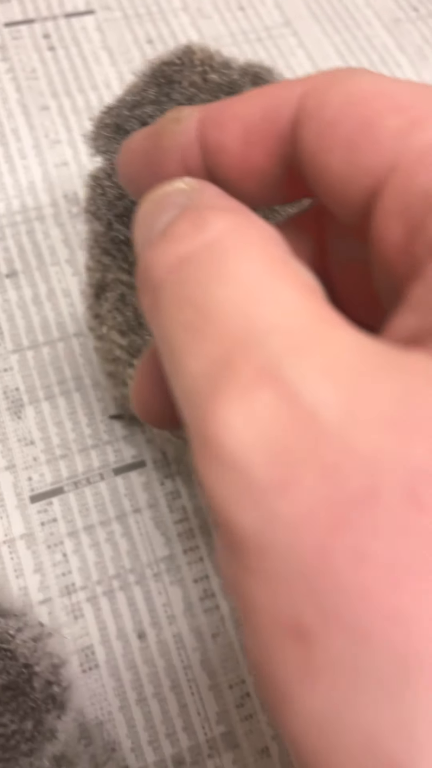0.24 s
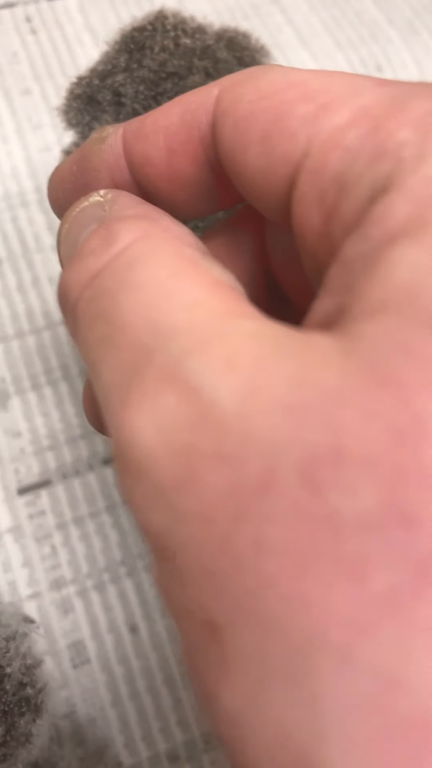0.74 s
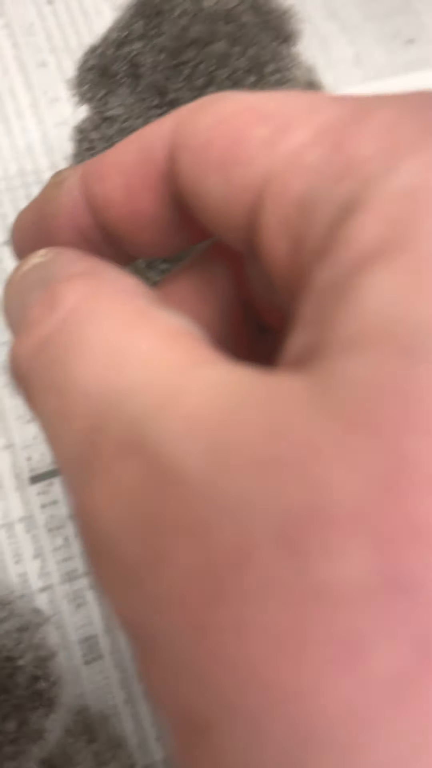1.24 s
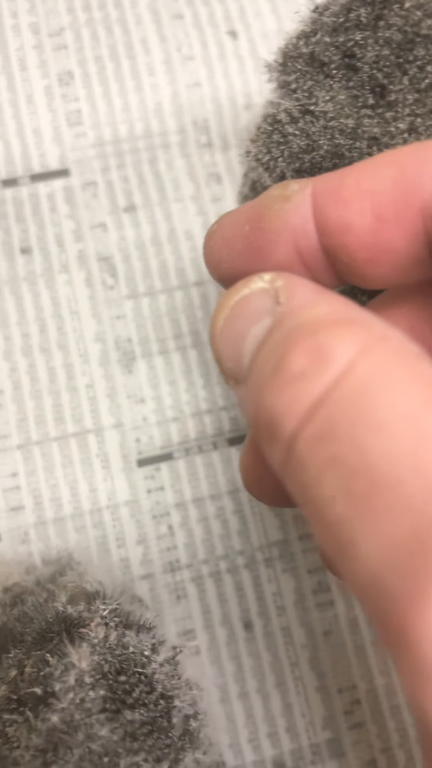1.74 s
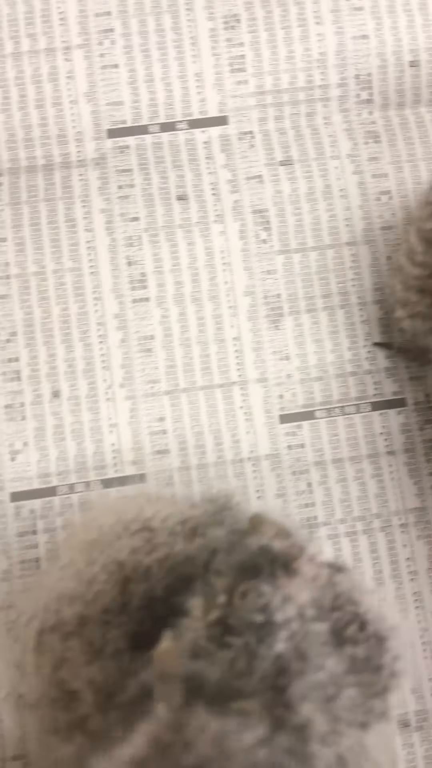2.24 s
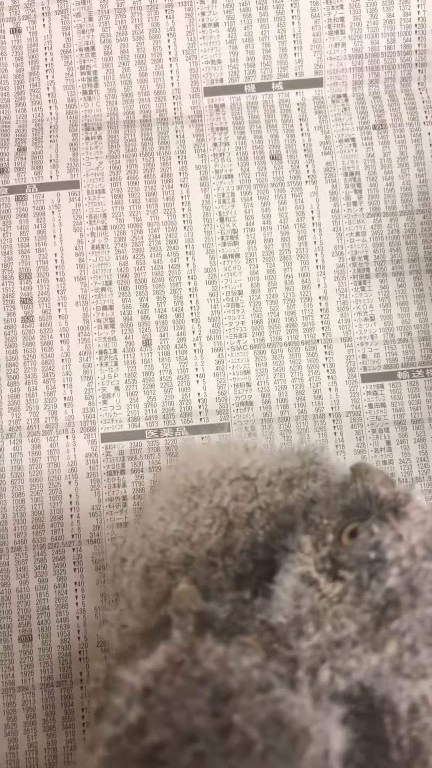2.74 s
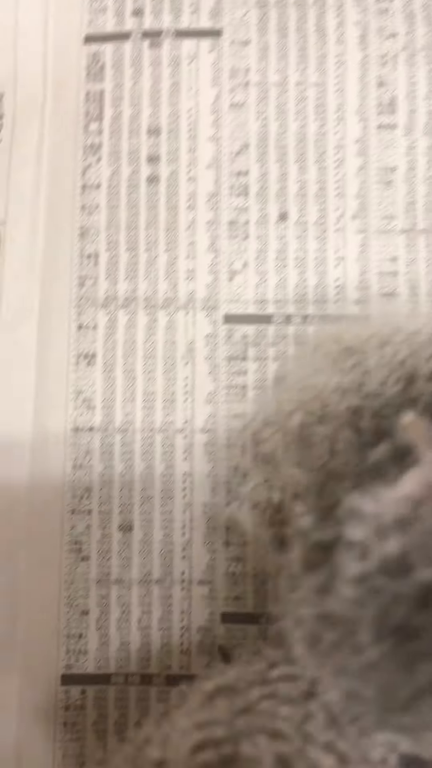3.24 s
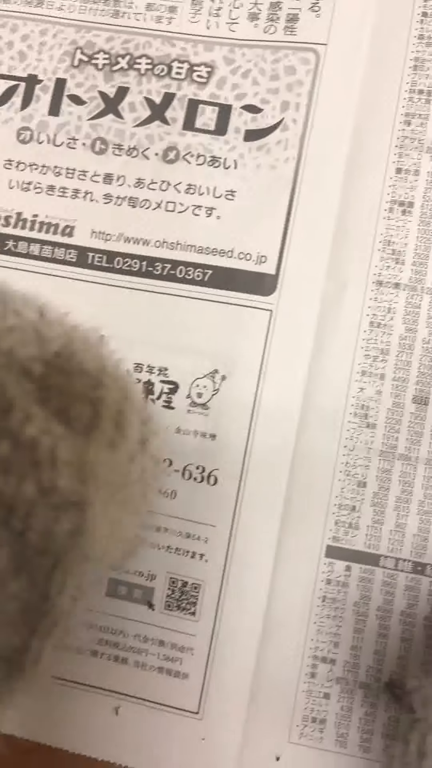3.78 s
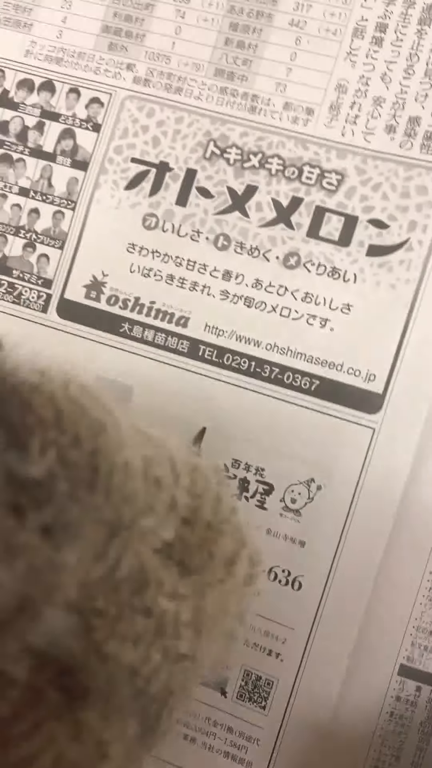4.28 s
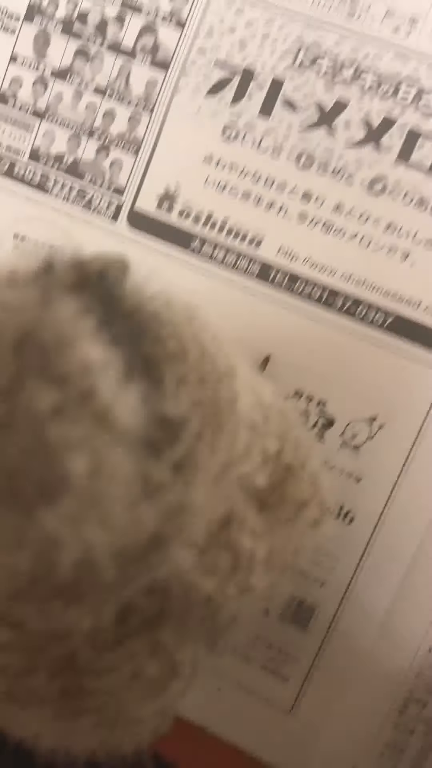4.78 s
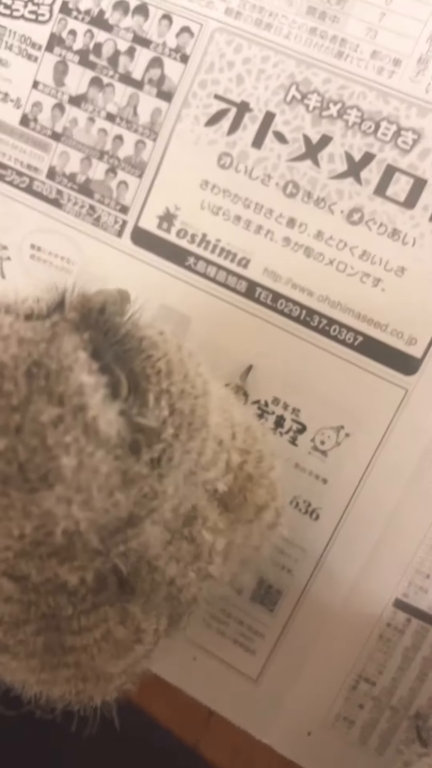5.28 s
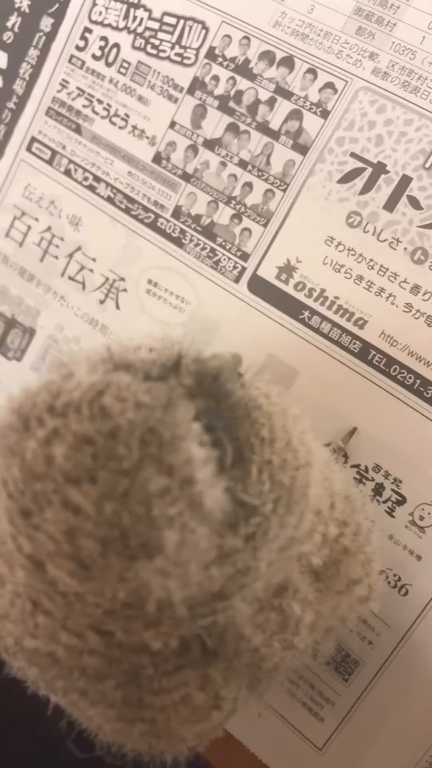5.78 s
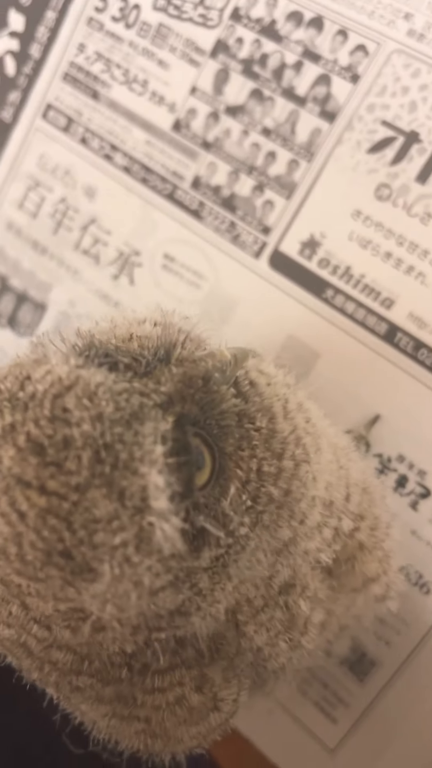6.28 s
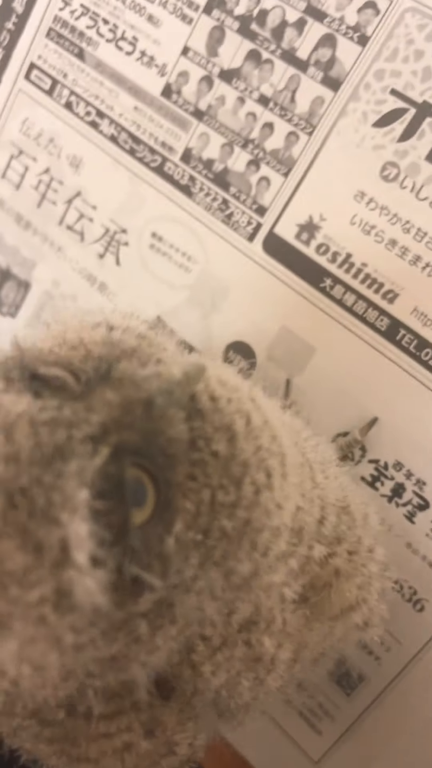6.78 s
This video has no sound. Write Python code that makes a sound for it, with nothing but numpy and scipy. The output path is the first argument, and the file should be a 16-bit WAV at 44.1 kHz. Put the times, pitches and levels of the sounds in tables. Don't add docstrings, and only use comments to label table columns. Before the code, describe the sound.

Owl chicks beg with harsh, rasping hisses in a small humming room, one faint call then three loud ones, with feather rustles and foot taps.

```python
import sys
import numpy as np
from scipy import signal
from scipy.fft import rfft, irfft, next_fast_len
from scipy.io import wavfile

SR = 44100
rng = np.random.default_rng(int(sys.argv[2]) if len(sys.argv) > 2 else 0)


def master_out(mix):
    frames = np.transpose(np.atleast_2d(mix))
    ceiling = np.clip(frames, -1, 1)
    pcm = np.round(ceiling * 32767).astype(np.int16)
    wavfile.write(sys.argv[1], SR, pcm)


def gain_from_db(level_db):
    decades = np.asarray(level_db, float) / 20
    return 10 ** decades


N = 309670

# [f/Hz, level/dB]
THROAT = [(980, -14), (1130, -2.5), (1600, 8.5), (2400, -0.5), (3500, -0.5), (4600, 0), (5300, 1),
          (5900, 6.5), (6800, -0.5), (7600, -0.5), (8800, 7), (10200, -0.5), (11500, -11), (12500, -4.5)]
# [f/Hz, level/dB per Hz]
FEATHERS = [(2000, -10), (4000, -6), (7000, -13), (9000, -3), (11000, -1.5), (12500, -4.5)]


def chicks():
    # [t/s, chaos 0-1]
    disturbance = [
        [(1.0, .5), (1.2, .4), (1.86, .42)],
        [(2.5, .35), (2.6, 0), (2.745, .06), (2.75, .38), (2.97, .4), (3.1, .8), (3.37, 1.0)],
        [(4.24, .8), (4.31, .3), (4.55, .42), (4.72, .72), (4.88, .45), (5.12, .9), (5.215, .8), (5.225, .45),
         (5.39, .55)],
        [(6.34, .3), (6.44, .5), (6.46, 0), (6.6, .08), (6.61, .2), (6.85, .5), (7.02, .4)],
    ]
    unrest = in_time(disturbance)[0]
    high_rows, low_rows = valves(lambda s: unrest[min(int(s * SR), N - 1)])
    high_hz, first_db, second_db, high_on = in_time(high_rows)
    low_hz, tone_db, mixed_db, breath_db, low_on = in_time(low_rows, fade_s=0.0013)
    chaos = unrest * (0.12 + 0.88 * low_on)
    grip = np.clip(3.7 * chaos, 0, 1)

    high = phase(high_hz + 12 * wander(60) + 460 * chaos ** 0.8 * wander(700))
    low = phase(low_hz + 240 * chaos ** 2 * wander(500))
    flutter = gain_from_db(1.0 * wander(100) + 3.6 * np.sqrt(chaos) * np.minimum(wander(300), 1.6))
    loose, rattling = rattle()

    mixed = combination_tones(high, low, grip, tone_db, mixed_db, second_db)
    air_jet = breath(low, chaos, grip, breath_db, mixed_db, second_db, rattling)
    engaged = low_on * (low_valve(low, low_hz, tone_db, chaos) + mixed + air_jet)
    engaged = filtered(engaged, lambda hz: gain_from_db(at_hz(THROAT, hz)))
    return high_on * flutter * gain_from_db(6) * whistle(high, first_db, second_db, unrest) + engaged + loose


def valves(unrest_at):
    # [t/s, f/Hz, level/dB]
    leads = [
        [(1.066, 2580, -75), (1.078, 2721, -63), (1.085, 2800, -80), (1.118, 2755, -65), (1.124, 2774, -63),
         (1.148, 2680, -63.5), (1.18, 2760, -60.5)],
        [(2.462, 3017, -82), (2.482, 3127, -49), (2.5, 3315, -58), (2.51, 3241, -44.5), (2.535, 3102, -89)],
        [(2.635, 3243, -56), (2.657, 3368, -36), (2.687, 3537, -37), (2.711, 3674, -31.5), (2.748, 3868, -41)],
        [(4.215, 2938, -76), (4.225, 3083, -51.5), (4.255, 3330, -53), (4.272, 2968, -54.5),
         (4.285, 2930, -60.5), (4.307, 3131, -41)],
        [(6.318, 3063, -88), (6.324, 3158, -45.5), (6.35, 3376, -47.5), (6.37, 3343, -50), (6.43, 3260, -46),
         (6.474, 3564, -43.5), (6.494, 3457, -42.5), (6.558, 3798, -39), (6.608, 4061, -27)],
    ]
    pinch_db = [-2.5, -4, -18, -2, -8.5]
    # [t/s, length/s, f/Hz, tone level/dB, mixed level/dB]
    brushes = [
        (1.075, .05, 1157, -54, -56),
        (2.48, .025, 1350, -52.5, -56),
        (2.722, 0.02394, 1445, -58, -47),
        (4.228, .022, 1185, -47, -53),
        (6.332, .035, 1236, -41, -60.5),
        (6.533, .057, 1442, -52.5, -35),
    ]
    # [t/s, high f/Hz, low f/Hz, effort level/dB, low valve level/dB]
    far = [(1.182, 2822, 1202, -67, -62), (1.316, 3063, 1240, -62, -59.5), (1.41, 3118, 1385, -53, -62.5),
           (1.584, 3218, 1410, -49.5, -62), (1.66, 3165, 1356, -51.5, -58.5),
           (1.75, 3020, 1255, -54.5, -60.5), (1.834, 2837, 1170, -60, -56), (1.859, 2751, 1216, -77, -77)]
    short_hiss = [(2.75, 3999, 1421, -38, -44.5), (2.8, 4090, 1439, -37.5, -37.5),
                  (2.968, 4333, 1548, -31.5, -42), (3.03, 4373, 1511, -31, -39),
                  (3.118, 4130, 1416, -30.5, -43), (3.15, 3980, 1300, -31, -47),
                  (3.21, 3739, 1272, -30.5, -46.5), (3.296, 3381, 1105, -31, -47.5),
                  (3.37, 3305, 1190, -39.5, -55)]
    long_hiss = [(4.309, 3302, 1195, -37, -43.5), (4.4, 3630, 1285, -36.5, -51.5),
                 (4.55, 3990, 1450, -34, -49), (4.68, 4240, 1607, -30.5, -49.5),
                 (4.781, 4393, 1640, -30.5, -43), (4.83, 4380, 1537, -29.5, -43),
                 (4.975, 4160, 1489, -32.5, -41.5), (5.088, 4050, 1232, -33, -43.5)]
    again = [(5.092, 3983, 1481, -37.5, -44.5), (5.2, 3831, 1509, -36, -46),
             (5.235, 3700, 1440, -34.5, -50.5), (5.3, 3487, 1328, -37.5, -52),
             (5.39, 3262, 1540, -45, -68.5)]
    last = [(6.61, 3999, 1450, -28.5, -44), (6.66, 4190, 1490, -33.5, -44), (6.7, 4230, 1560, -34, -48),
            (6.778, 4286, 1566, -31, -45.5), (6.836, 4380, 1594, -32.5, -44),
            (7.02, 4450, 1522, -30.5, -41.5)]
    carry_db = [-3, 0.5, -2, -1.5, 3.5]
    mixing_db = [-1, -2, -3, 1, -2.5]
    breath_db = -11
    swell = [(0, -1, 8.5), (0.4595, 0, 0), (1, 0.5, 19)]

    high = [[(s, hz, db, db + pinch) for s, hz, db in rows] for rows, pinch in zip(leads, pinch_db)]
    low = [[(s + part * length, hz * (1 + 0.04 * bend), tone - loss,
             mix - loss / 2, tone - loss / 2 + breath_db) for part, bend, loss in swell]
           for s, length, hz, tone, mix in brushes]
    for rows, carry, mixing in zip([far, short_hiss, long_hiss, again, last], carry_db, mixing_db):
        high.append([(s, hz, -39.5 + carry + 0.55 * (effort + 35) - 3 * unrest_at(s),
                      effort - 7.5 + 16.5 * (hz - 4000) / 1000) for s, hz, _, effort, _ in rows])
        low.append([(s, hz, tone, effort + mixing, tone + breath_db + 8 * unrest_at(s))
                    for s, _, hz, effort, tone in rows])
    return sorted(high), sorted(low)


def whistle(high, first_db, second_db, unrest):
    third_db = second_db - 6 + 0.4 * np.minimum(first_db + 47, 0)
    tone = gain_from_db(first_db) * np.sin(high) + gain_from_db(second_db) * np.sin(2 * high) + gain_from_db(third_db) * np.sin(3 * high)
    return tone + unrest * gain_from_db(np.maximum(first_db, second_db) - 20) * coloured(THROAT)


def low_valve(low, low_hz, tone_db, chaos):
    # [t/s, half length/s]
    stalls = [(2.897, 0.00073), (2.936, .002), (3.006, 0.0035), (3.025, 0.0047), (3.052, 0.0066),
              (3.076, 0.005), (3.102, .004), (4.426, 0.0075), (4.801, .002), (4.823, 0.0018),
              (6.644, 0.0035), (6.668, 0.0037), (6.733, 0.0091)]
    t = np.arange(N) / SR
    beat = gain_from_db(-14 * chaos * np.maximum(wander(70), 0))
    for s, half in stalls:
        beat = beat * (1 - 0.95 * np.exp(-((t - s) / half) ** 4))
    overtone = gain_from_db(-16 + 0.025 * np.clip(low_hz - 1200, 0, 250))
    return gain_from_db(tone_db + 5) * beat * (np.sin(low) + overtone * np.sin(2 * low))


def combination_tones(high, low, grip, tone_db, mixed_db, second_db):
    multiples = [(1, 1), (1, -1), (0, 2), (1, 2), (0, 4), (2, -1), (2, 1), (2, 2), (3, -1)]
    multiple_db = [8, -25, -39.5, -5.5, -9.5, -2, -15.5, -5, -21]
    strength = [tone_db + 4.0, mixed_db - 7.0, second_db, second_db - 9.5]
    total = np.zeros(N)
    for (k, m), db in zip(multiples, multiple_db):
        level = gain_from_db(strength[k] + db + 2.8 * wander(400))
        total = total + grip ** k * level * np.sin(k * high + m * low)
    return total


def breath(low, chaos, grip, breath_db, mixed_db, second_db, rattling):
    puff = gain_from_db(breath_db + 11 + 6.65 * rattling) * sieve(2500, "low")
    rasp = np.sqrt(chaos) * gain_from_db(0.5 * (mixed_db + breath_db) + 11.5) * sieve(3300, "high")
    jet = grip * gain_from_db(second_db + 4.5 + 2 * wander(14)) * sieve(6800, "high")
    return (puff + rasp + jet) * (1 + 0.18 * np.cos(low)) * gain_from_db(2.3 * wander(200))


def rattle():
    # [t/s, end t/s, f/Hz, last f/Hz, level/dB]
    rattles = [
        (3.124, 3.368, 1210, 1034, -42),
        (4.77, 4.968, 1157, 1399, -42.5),
        (4.969, 5.232, 1299, 1174, -43),
        (6.741, 7.027, 714, 625.5, -54.5),
    ]
    hz, db, on = in_time([[(s, start_hz, level - 3.5), ((s + end) / 2, (start_hz + end_hz) / 2, level),
                           (end, end_hz, level - 2)] for s, end, start_hz, end_hz, level in rattles])
    loose = phase(hz + 110 * wander(400))
    return on * gain_from_db(db + 3.1 * wander(60)) * np.sin(loose), on * (hz > 900)


def drops():
    # [t/s, length/s, f/Hz, last f/Hz, level/dB]
    falls = [
        (1.84, 0.03, 2820, 2250, -57.5),
        (3.363, 0.021, 3400, 2810, -38.5),
        (5.222, .036, 3765, 3090, -39),
        (5.378, 0.046, 3222, 2650, -51.5),
    ]
    shape = [(0, -1), (0.3, 0), (0.6, 0), (1, 14)]
    hz, db, on = in_time([[(s + part * length, start_hz + (end_hz - start_hz) * part, level - loss)
                           for part, loss in shape] for s, length, start_hz, end_hz, level in falls])
    turn = phase(hz + 45 * wander(400))
    return on * gain_from_db(db + 8.5 + 0.83 * wander(200)) * (np.sin(turn) + gain_from_db(-9) * np.sin(2 * turn))


def rustle():
    # [peak t/s, swell/s, fade/s, level/dB]
    strokes = [
        (2.475, 0.013, 0.022, -56),
        (3.405, 0.006, 0.37, -51),
        (4.223, 0.01, 0.041, -43),
        (5.49, 0.086, 0.1, -54),
    ]
    db, on = in_time([[(s - swell, level - 9), (s, level), (s + fade, level - 18)]
                      for s, swell, fade, level in strokes], fade_s=0.023)
    return on * gain_from_db(db - 7.5 + 0.86 * wander(40)) * coloured(FEATHERS)


def footfalls():
    # [t/s, peak level/dB, f/Hz, T60/s]
    taps = [
        (1.542, -32.5, 295, 0.024),
        (2.02, -33, 603, 0.023),
        (2.319, -36, 600, 0.028),
        (4.168, -46, 628, 0.025),
            (5.295, -18, 176, 0.015),
        (5.298, -26, 312, 0.029),
        (5.297, -36.5, 537, 0.038),
        (5.776, -33, 222, 0.048),
    ]
    return sum(ring(*row) for row in taps)


def claws():
    # [t/s, peak level/dB]
    ticks = [
        (2.0767, -68),
        (3.6194, -59),
        (5.7737, -53.5),
    ]
    t = np.arange(N) / SR
    decay = sum(gain_from_db(db - 60 * np.clip(t - s, 0, 1) / 0.03) * (t > s) for s, db in ticks)
    return decay * coloured(FEATHERS)


def room(x):
    # [f/Hz, level/dB]
    reflectance = [(1500, -12), (3000, 6), (4200, 6), (4800, -6), (5300, -2.5), (6000, -10), (7500, 6),
                   (8600, -18.5), (9700, -10), (10800, 10.5), (12000, -11)]
    t = np.arange(int(0.4 * SR)) / SR
    walls = gain_from_db(-60 * t / 0.1)
    floor = gain_from_db(1 - 60 * t / 0.026)
    tails = rng.standard_normal((2, len(t))) * (walls + floor) * (t > 0.0004)
    tails = tails / np.sqrt(np.sum(tails ** 2, axis=1, keepdims=True))
    sent = filtered(x, lambda hz: gain_from_db(at_hz(reflectance, hz)))
    return gain_from_db(-11) * signal.fftconvolve(sent[None], tails, axes=1)[:, :N]


def appliance():
    harmonics = [1, 1.75, 2, 4, 5, 6, 7, 8, 9, 11, 24, 52]
    # [early level/dB, late level/dB]
    balance = [(-71, -75.5), (-75, -89.5), (-67, -81), (-73, -68), (-69.5, -91), (-67.5, -72), (-67, -75.5),
               (-68.5, -72.5), (-72.5, -77.5), (-75.5, -81), (-98, -88.5), (-100, -100)]
    # [t/s, level/dB]
    whoosh = [(0, -67), (1, -66), (2.2, -71), (3.6, -79), (6, -77), (7, -74)]
    turn = phase(166.6 + 0.5 * wander(3))
    late = np.clip((np.arange(N) / SR - 1.5) / 2.0, 0, 1)
    hum = np.zeros(N)
    for k, (early_db, late_db) in zip(harmonics, balance):
        level = gain_from_db(early_db + (late_db - early_db) * late + 2.0 * wander(6))
        hum = hum + level * np.sin(k * turn + 2 * np.pi * rng.random())
    return hum + gain_from_db(in_time([whoosh])[0] + 13) * sieve([800, 2300], "band", order=2)


def room_air():
    # [f/Hz, level/dB per Hz]
    spectrum = [(13, -85.5), (22, -16.5), (91, 0.5), (125, -10), (163, -1.5), (354, -17), (572, -24),
                (619, -26), (671, -24.5), (1060, -28), (1540, -32), (1950, -37), (5530, -57.5), (9190, -58),
                (13000, -51)]
    # [f/Hz, level/dB]
    unshared = [(30, -42.5), (100, -31.5), (250, -17.5), (600, -2.5), (1200, 0.5), (2500, -1.5), (6000, -2),
                (12000, -14)]
    return gain_from_db(-48) * (coloured(spectrum) + coloured(spectrum, unshared) * np.array([[1], [-1]]))


def in_time(tables, fade_s=0.0011):
    t = np.arange(N) / SR
    s, *columns = np.transpose(np.concatenate(tables))
    gate = np.zeros(N)
    for rows in tables:
        inside_s = np.minimum(t - rows[0][0], rows[-1][0] - t)
        gate = gate + np.clip(inside_s / fade_s + 1, 0, 1)
    return [np.interp(t, s, c) for c in columns] + [np.minimum(gate, 1)]


def phase(hz):
    return 2 * np.pi * np.cumsum(hz) / SR


def at_hz(points, hz):
    table_hz, values = np.transpose(points)
    return np.interp(np.log(hz + 1), np.log(table_hz), values)


def coloured(*spectra):
    hz = np.arange(N // 2 + 1) * SR / N
    shape = gain_from_db(at_hz(spectra[0], hz))
    shape = shape / np.sqrt(np.mean(shape ** 2))
    shape = shape * gain_from_db(sum(at_hz(s, hz) for s in spectra[1:]))
    return irfft(rfft(rng.standard_normal(N)) * shape, N)


def sieve(edge_hz, kind, order=4):
    return signal.sosfilt(signal.butter(order, edge_hz, kind, fs=SR, output="sos"), rng.standard_normal(N))


def wander(rate_hz):
    r = np.exp(-2 * np.pi * rate_hz / SR)
    x = signal.lfilter([1], [1, -2 * r, r * r], rng.standard_normal(N))
    return x / x.std()


def ring(at_s, level_db, hz, t60):
    t = np.clip(np.arange(N) / SR - at_s, 0, 3 * t60)
    onset = np.minimum(t * hz, 1)
    return gain_from_db(level_db - 60 * t / t60) * np.sin(2 * np.pi * hz * t) * onset * (t < 3 * t60)


def filtered(x, gain):
    size = next_fast_len(N + SR // 4)
    hz = np.arange(size // 2 + 1) * SR / size
    return irfft(rfft(x, size) * gain(hz), size)[:N]


def scene():
    near = chicks() + drops() + rustle() + footfalls() + claws()
    return near + room(near) + room_air() + appliance()


def band_limit(x):
    return signal.sosfilt(signal.butter(12, 13240, fs=SR, output="sos"), x)


def record(dry):
    # [f/Hz, level/dB]
    shade = [(2300, 0), (2600, 1), (3200, -5), (3800, -2), (4500, 0)]
    # [f/Hz, lag/rad]
    lag = [(2300, 0), (3300, .9), (4200, 1.4), (4550, 2.4), (4800, 3.14), (5250, 5.1), (5700, 6.28),
           (6300, 6.5), (7500, 8.0), (8600, 9.36), (9700, 9.5), (10300, 10.1), (11300, 11.7),
           (12100, 12.57)]
    left = filtered(dry[0], lambda hz: gain_from_db(at_hz(shade, hz)))
    right = filtered(dry[1], lambda hz: np.exp(-1j * at_hz(lag, hz)))
    rounded = 0.37 * np.tanh(np.stack([left, right]) / 0.41)
    top_cut = signal.cheby2(14, 50, 12450, fs=SR, output="sos")
    rumble_cut = signal.butter(2, 36.0, "high", fs=SR, output="sos")
    mix = signal.sosfilt(np.vstack([top_cut, rumble_cut]), rounded)
    return band_limit(mix)


dry = scene()
out = record(dry)
master_out(out)
```